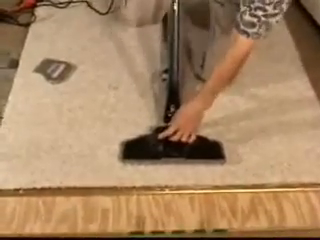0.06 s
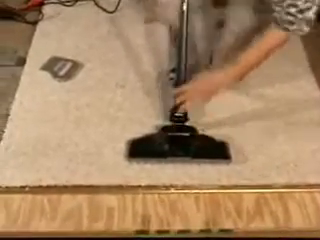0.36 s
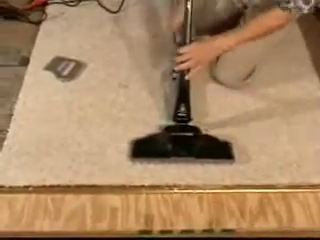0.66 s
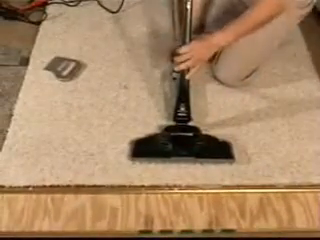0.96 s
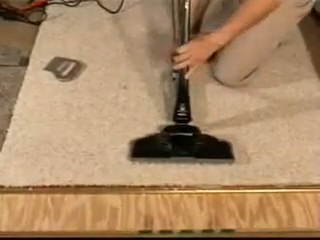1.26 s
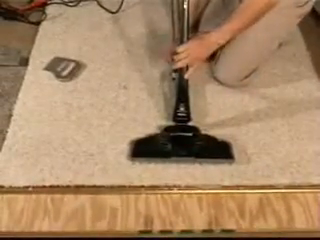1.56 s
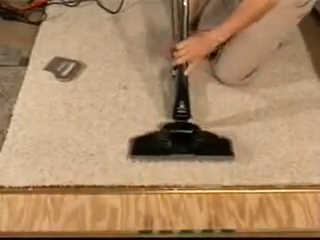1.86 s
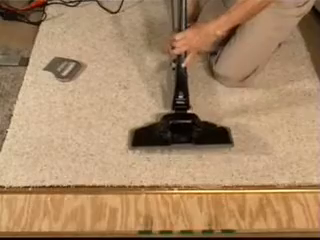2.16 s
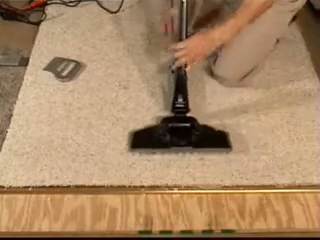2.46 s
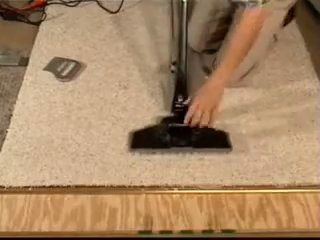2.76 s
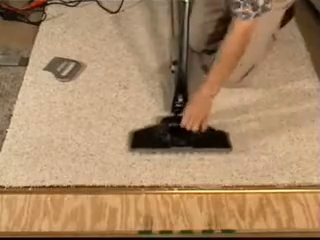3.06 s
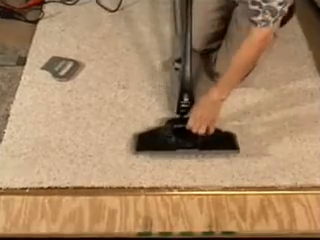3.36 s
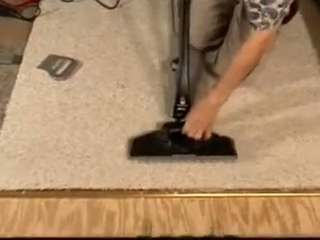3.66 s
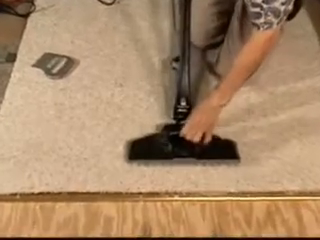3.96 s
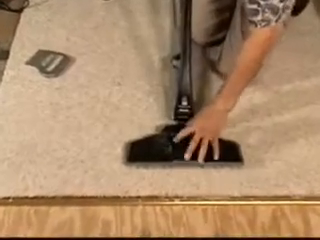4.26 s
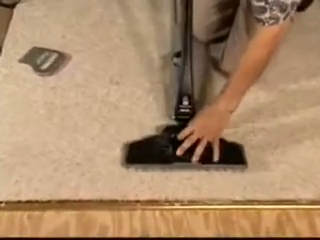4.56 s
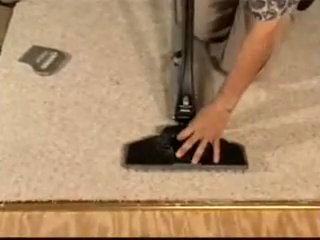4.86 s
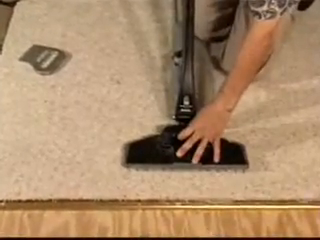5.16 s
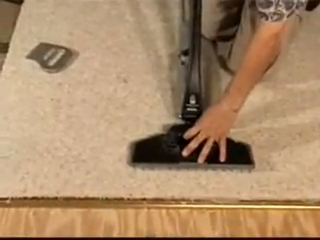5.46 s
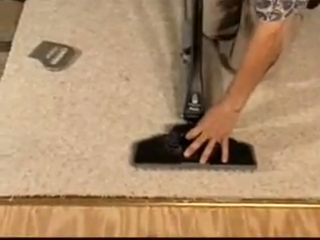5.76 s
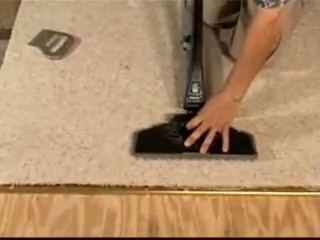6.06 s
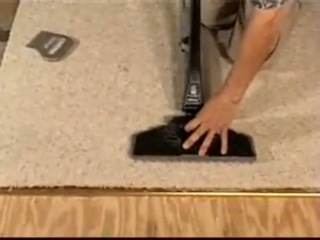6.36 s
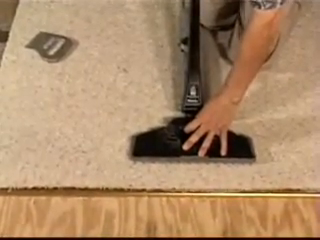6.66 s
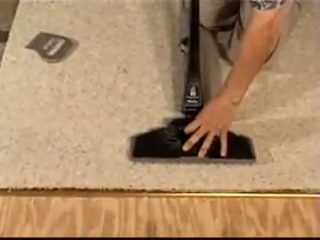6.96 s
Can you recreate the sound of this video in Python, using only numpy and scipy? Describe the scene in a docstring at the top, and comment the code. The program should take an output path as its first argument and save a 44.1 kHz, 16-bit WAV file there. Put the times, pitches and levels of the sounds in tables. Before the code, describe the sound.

A plastic vacuum floor head and its telescopic tube clack, click and rattle irregularly on carpet, with clothes rubbing close by.

```python
"""In a small room, a carpet stretcher is handled on a carpeted floor, close to the listener.
Impacts excite the modes of its hollow plastic head and telescopic tube, which clack and rattle;
the sprung catch snaps and rings, and the tool thuds on the boards. Friction makes its parts scrape
and squeak, and sleeves and knees rub on the pile, over a faint hum.
The loudest blows overload the microphones."""
import sys
import numpy as np
from scipy import signal
from scipy.fft import rfft, irfft, next_fast_len
from scipy.io import wavfile
from scipy.ndimage import uniform_filter1d, map_coordinates

SR = 44100
rng = np.random.default_rng(int(sys.argv[2]) if len(sys.argv) > 2 else 0)


def materialize(psi):
    """Save the field psi as 16-bit PCM at rate SR to the path in sys.argv[1].

    A 1-D psi becomes a single channel; in a 2-D psi each row is a channel.
    """
    bounded = np.clip(np.atleast_2d(psi).T, -1, 1)
    quanta = np.round(bounded * 32767).astype(np.int16)
    wavfile.write(sys.argv[1], SR, quanta)


N = 318446

# normal modes of head and tube: pitch_hz, level_db, t60_s
HOUSING_MODES = [(336.7, -16.5, 0.2), (477.5, -4, 0.19), (517, -8, 0.2), (556.6, -2.5, 0.063),
                 (690, -9, 0.022), (856, -8.5, 0.081), (980.6, -1, 0.051), (1019.7, -7.5, 0.12),
                 (1092, -12, 0.23), (1177, -2.5, 0.059), (1512, 1.5, 0.016), (1540, -26, 0.25),
                 (1707, -1.5, 0.062), (1846, -2.5, 0.092), (1940, -9, 0.11), (2276, -4, .08),
                 (2344, -27.5, 0.12), (2565, -7, 0.074), (3050, -24, 0.038)]


def amp(db):
    """Amplitude grows tenfold every 20 decibels."""
    return 10 ** (np.asarray(db) / 20)


def unit(x):
    """Normalisation to rms 1."""
    return x / np.sqrt(np.mean(x ** 2) + 1e-20)


def along(points, hz):
    """Interpolation of (frequency_hz, value) points on a logarithmic frequency axis."""
    knots_hz, values = np.transpose(points)
    return np.interp(np.log(hz + 1), np.log(knots_hz + 1), values)


def wobble(rate):
    """Slow random modulation: a spline through rate knots a second."""
    return map_coordinates(rng.standard_normal(int(N * rate / SR) + 4), [np.arange(N) * rate / SR])


def filtered(x, response):
    """Linear filtering: the spectrum is multiplied by a frequency response."""
    size = next_fast_len(N + SR // 2)
    return irfft(rfft(x, size) * response(np.fft.rfftfreq(size, 1 / SR)), size)[..., :N]


def panned(x, pan_db):
    """A level difference, left minus right, gives a sound its direction."""
    return amp([[pan_db / 2], [-pan_db / 2]]) * x


def placed(x, s):
    """The level difference follows the hand along the tool, here at s seconds."""
    # hand position: time_s, pan_db
    hand_path = [(0, -2.5), (1.5, -5.5), (1.9, -2.5), (2.3, 1), (3.0, -1), (3.8, -1.5), (4.9, -3), (5.4, 1),
                 (7.2, -1)]
    return panned(x, np.interp(s, *np.transpose(hand_path)))


def add(track, s, sound):
    """Superposition: a sound joins the track at s seconds."""
    part = track[:, round(s * SR):][:, :sound.shape[-1]]
    part += sound[..., :part.shape[-1]]


def rush(spectrum, pan_db, side_db):
    """Partly coherent stereo noise of a given spectrum and rms 1."""
    mid, side = filtered(rng.standard_normal((2, N)), lambda hz: amp(along(spectrum, hz)))
    return unit(panned(mid, pan_db) + amp(side_db) * np.array([side, -side]))


def swells(rows, fall_ratio=1.71, roundness=2.17):
    """Incoherent strokes (peak_s, rise_s, level_db) add in power; each falls slower than it rises."""
    s, rise, db = np.transpose(rows)[:, :, None]
    t = np.arange(0, N / SR, .002)
    from_peak = np.maximum(s - t, (t - s) / fall_ratio) / rise
    gains = amp(db) * np.exp(-np.minimum(from_peak, 10) ** roundness)
    return np.interp(np.arange(N) / SR, t, np.linalg.norm(gains, axis=0))


def ring(modes, t, scatter_db, detune, focus_hz=1000, focus_db=0, focus_octaves=0.39):
    """Free vibration as a sum of damped modes; the contact point favours those near focus_hz."""
    hz, db, t60 = np.transpose(modes)[:, :, None]
    size, shift, phase = rng.standard_normal((3, len(modes), 1))
    favour = focus_db * (.5 - np.minimum((np.log2(hz / focus_hz) / focus_octaves) ** 2, 1))
    waves = np.sin(2 * np.pi * (hz * (1 + detune * shift) * t + phase))
    return np.sum(amp(db + favour + scatter_db * size) * np.exp(-np.log(1000) * t / t60) * waves, axis=0)


def chatter(t, t60, grain_db, hold=1, echo=0.63):
    """Tiny contacts die away, comb-filtered by echoes in the hollow parts; hold > 1 delays the fall."""
    grain = unit(uniform_filter1d(rng.standard_normal(len(t)), size=44))
    burst = rng.standard_normal(len(t)) * amp(grain_db * grain - 20 * (3 * t / t60) ** hold)
    cavity = np.zeros(SR // 400)
    cavity[rng.integers(12, len(cavity), size=3)] = echo * rng.choice([-1, 1], size=3)
    cavity[0] = 1
    return signal.lfilter(cavity / np.linalg.norm(cavity), [1], burst)


def voiced(blow, levels_db):
    """Spectral balance sets timbre: the onset of a blow is scaled to a level in each of four bands."""
    # thump, hollow, shell and crack bands: low_hz, high_hz
    bands = [(25, 200), (200, 750), (750, 2800), (2800, 11500)]
    out = np.zeros(len(blow))
    for edges, db in zip(bands, levels_db):
        band = signal.sosfilt(signal.butter(3, edges, "band", fs=SR, output="sos"), blow)
        onset = round(SR * max(.012, .6 / edges[0]))
        out += amp(db) * band / np.sqrt(np.mean(band[:onset] ** 2))
    return out


def stick_slip(rows, sag, waver, pan_db):
    """Quick slips merge into a rough tone; its pitch follows the speed, ending at sag times the first."""
    out = np.zeros((2, N))
    for s, length, hz, db in rows:
        size = round(length * SR)
        jitter, grip = unit(uniform_filter1d(rng.standard_normal((2, size)), size=60))
        speed = np.linspace(1, sag, size) * (1 + waver * jitter)
        tone = np.sin(2 * np.pi * np.cumsum(hz * speed) / SR)
        rough = unit(tone * amp(5 * grip))
        add(out, s, panned(amp(db) * rough * signal.windows.tukey(size, .5), pan_db))
    return out


def hum():
    """Steady pure tones superpose into the room's faint hum."""
    # partials: pitch_hz, level_db
    tones = [(60, -52.5), (840, -57.5), (958, -63), (1324, -57), (1567, -67)]
    t = np.arange(N) / SR
    return sum(np.sqrt(2) * amp(db) * np.sin(2 * np.pi * (hz * t + rng.random())) for hz, db in tones)


def reverberation(x):
    """A diffuse field decays exponentially, with a different tail at each side."""
    # reverberation times: frequency_hz, t60_s
    decay_times = [(150, 0.12), (1000, 0.17), (4000, 0.2), (11000, 0.17)]
    hz, t, noise = signal.stft(rng.standard_normal((2, SR // 2)), SR, nperseg=256)
    tail = signal.istft(noise * amp(-60 * t / along(decay_times, hz)[:, None]), SR, nperseg=256)[1]
    tail = np.pad(tail, ((0, 0), (SR // 250, 0)))  # reflections arrive 4 ms late
    return signal.fftconvolve(x, tail / np.linalg.norm(tail[0]), axes=1)[:, :N]


def rubbing(rumble_db=-10):
    """Sliding friction of knees and sleeves makes broadband noise: rumble, pile scuff and cloth hiss."""
    # strokes over the pile: peak_s, rise_s, scuff_db, hiss_over_scuff_db
    strokes = [(0.02, 0.15, -31, -24), (0.26, 0.22, -34, 0), (0.62, 0.032, -49, 9.5),
               (0.88, 0.13, -45, 2.5), (1.438, 0.1, -28, -1.5), (1.68, 0.083, -37.5, -2),
               (1.97, 0.14, -37.5, -2.5), (2.13, 0.11, -31.5, 1.5), (2.289, 0.078, -23, -0.5),
               (2.44, 0.076, -26, -2.5), (2.7, 0.15, -41.5, 3), (3.2, 0.17, -39.5, -2),
               (3.73, 0.14, -37.5, -4), (4.28, 0.14, -31, -11), (4.5, 0.15, -32, -15),
               (4.81, 0.09, -42.5, -1), (5.32, 0.12, -40.5, 2), (5.76, 0.31, -36.5, -7.5),
               (6.23, 0.19, -34.5, -1.5), (6.58, 0.2, -36, -5.5), (7.2, 0.19, -40.5, -5.5)]
    # spectra of the three noises: frequency_hz, density_db
    rumble_spectrum = [(12, -37), (20, -3), (50, -1), (166, -4), (214, -7.5), (300, -7), (390, -10.5),
                       (660, -120)]
    scuff_spectrum = [(110, -54), (180, -3), (367, 3), (408, -0.5), (515, 1.5), (634, -3.5), (1020, -5),
                      (1150, -7), (1770, -8.5), (2850, -15.5), (4000, -30), (5200, -36), (8800, -120)]
    cloth_spectrum = [(1290, -38), (2200, -1.5), (2850, -3.5), (4080, 1.5), (5330, -2), (6180, 0),
                      (8600, -5.5), (10500, -4), (11200, -3), (11800, -31), (15300, -43), (22000, -120)]
    # levels between strokes: rumble_db, scuff_db, hiss_db
    rest_db = (-45.5, -44.5, -48)
    scuff = swells([(s, rise, db) for s, rise, db, _ in strokes])
    cloth = swells([(s, rise, db + hiss_db) for s, rise, db, hiss_db in strokes])
    rumble, scuff, cloth = np.hypot([amp(rumble_db) * scuff, scuff, cloth], amp(rest_db)[:, None])
    low = rumble * amp(4.0 * wobble(22)) * rush(rumble_spectrum, pan_db=-1.5, side_db=-6)
    pile = scuff * amp(1.4 * wobble(60)) * rush(scuff_spectrum, pan_db=-2, side_db=-10)
    hiss = cloth * amp(0.69 * wobble(90)) * rush(cloth_spectrum, pan_db=-4, side_db=-11)
    return low + pile + hiss


def bumps(floor_hz=65, t60=0.13, attack_s=0.012):
    """Soft impacts of knees and palms excite only a few uneven low cycles in the floor."""
    # landings: start_s, level_db
    landings = [(0.452, -25), (0.565, -23), (0.89, -23.5), (2.13, -14), (2.774, -20), (2.935, -15.5),
                (3.345, -30), (4.745, -19), (5.655, -24), (6.853, -17)]
    out, t = np.zeros((2, N)), np.arange(SR // 4) / SR
    for s, db in landings:
        hz = floor_hz * rng.lognormal(0, 0.45, size=(6, 1))
        uneven = unit(np.sin(2 * np.pi * hz * t).sum(axis=0))
        add(out, s, amp(db - 60 * t / t60) * (1 - np.exp(-t / attack_s)) * uneven)
    return out


def cloth_zips():
    """Periodic contact of ribbed cloth gives a tone that falls as the rub slows."""
    # rubs: start_s, length_s, first_pitch_hz, level_db
    rubs = [(1.665, 0.04, 11200, -43), (1.67, .04, 6440, -42), (1.8, 0.045, 5330, -45),
            (3.68, 0.17, 11300, -50), (4.17, .053, 10900, -42), (6.53, .096, 11500, -46),
            (6.53, 0.2, 6600, -40.5)]
    return stick_slip(rubs, sag=0.87, waver=.018, pan_db=-2)


def tube_squeaks():
    """Stick-slip friction makes the tube squeak in its sleeve."""
    # squeaks: start_s, length_s, pitch_hz, level_db
    slips = [(1.871, .016, 1080, -14), (2.102, .011, 11150, -12), (2.108, .02, 9000, -21),
             (2.112, .04, 4880, -30), (2.144, .016, 1440, -21)]
    return stick_slip(slips, sag=1, waver=.02, pan_db=-1)


def tube_slides(tube_hz=1040, width_hz=110):
    """Forced vibration: friction of the inner tube drives the tube's strongest resonance."""
    # slides: peak_s, rise_s, level_db
    slides = [(1.48, 0.072, -31), (1.95, 0.078, -33.5), (2.29, 0.053, -33), (2.485, 0.048, -22.5)]
    resonance = lambda hz: (1j * hz * width_hz / (tube_hz ** 2 - hz * hz + 1j * hz * width_hz)) ** 2
    friction = unit(filtered(rng.standard_normal(N), resonance))
    return panned(swells(slides) * friction, pan_db=-2)


def scrapes(ring_share=0.49, width_hz=90, db_per_octave=6):
    """Source and filter: the friction noise of plastic on plastic is coloured by the housing's modes."""
    # drags: peak_s, half_length_s, level_db, centre_hz
    drags = [(0.046, 0.015, -23.5, 710), (0.344, 0.0066, -18.5, 1200), (0.366, 0.037, -23.5, 1060),
             (1.927, 0.012, -29, 2280), (3.137, 0.033, -25.5, 900), (3.285, 0.014, -28.5, 1230),
             (4.134, 0.065, -26.5, 1400), (4.473, 0.034, -25.5, 1300), (5.668, 0.023, -24.5, 875)]
    out = np.zeros((2, N))
    for s, half, db, centre_hz in drags:
        t = np.arange(SR // 4) / SR + max(s - .1, 0)
        f = np.fft.rfftfreq(len(t), 1 / SR) + 1
        modes = sum(amp(level) / (1 + 2j * (f - hz) / width_hz) for hz, level, _ in HOUSING_MODES)
        rolloff = amp(-db_per_octave * np.abs(np.log2(f / centre_hz)))
        colour = (ring_share * np.abs(modes) + (1 - ring_share) / 2) * rolloff
        friction = unit(irfft(rfft(rng.standard_normal(len(t))) * colour, len(t)))
        add(out, t[0], panned(amp(db) * friction * np.exp(-((t - s) / half) ** 2 / 2), pan_db=-4))
    return out


def thuds(attack_s=0.0011, gain_db=9.5):
    """Cushioned impact: the pile softens the tool's landing, so only low board modes answer."""
    # landings: start_s, relative_db
    landings = [(0.163, -26), (2.104, -30), (5.629, -26.5), (5.662, -15.5), (5.676, -21), (6.855, -30)]
    # modes of the boards: pitch_hz, level_db, t60_s
    board_modes = [(247, -8.5, 0.12), (316, 4.5, 0.049), (359, -7, 0.18), (520, -0.5, 0.037),
                   (1020, -36, 0.092)]
    out, t = np.zeros((2, N)), np.arange(SR // 3) / SR
    for s, db in landings:
        boom = ring(board_modes, t, scatter_db=1.5, detune=0.013) * (1 - np.exp(-t / attack_s))
        add(out, s, panned(amp(db + gain_db) * boom, pan_db=-3))
    return out


def spring_pings():
    """Light damping lets the catch's steel spring ring on after some firm snaps."""
    # pings: start_s, level_db
    pings = [(5.269, -21), (5.717, -39), (5.955, -27.5), (6.215, -31), (6.604, -27), (7.063, -36)]
    # modes of the spring: pitch_hz, level_db, t60_s
    spring_modes = [(1523, -10, .15), (2153, -17, .2), (4316, 0, .35), (4425, -9, .22), (5475, -11, .25),
                    (7368, -15, .24)]
    out, t = np.zeros((2, N)), np.arange(SR // 2) / SR
    for s, db in pings:
        add(out, s, placed(amp(db) * ring(spring_modes, t, scatter_db=1, detune=.0003), s))
    return out


def catch_snaps(attack_s=0.00072, buzz_db=-21, buzz_t60=0.34, push_hz=100, push_s=0.0016):
    """A brief impact has a broad spectrum: the catch cracks with a low push, and the parts buzz on."""
    # snaps: start_s, strength_db, t60_s
    snaps = [(1.336, -28, 0.076), (1.423, -18.5, 0.17), (1.436, -25, 0.034), (1.466, -23, .06),
             (1.501, -18.5, 0.089), (2.105, -17.5, 0.12), (2.264, -9, 0.065), (2.287, -18, 0.2),
             (4.828, -42.5, 0.017), (5.268, -10, 0.045), (5.278, -14.5, 0.093), (5.597, -19.5, 0.022),
             (5.675, -26.5, 0.013), (5.717, -13, 0.041), (5.797, -30.5, 0.014), (5.898, -34, .02),
             (5.923, -34, 0.0065), (5.955, -15.5, 0.042), (5.975, -23, 0.019), (6.034, -33, 0.036),
             (6.133, -35, 0.016), (6.214, -16.5, 0.068), (6.506, -34, 0.022), (6.604, -15.5, 0.022),
             (6.854, -19.5, 0.034), (7.063, -19.5, 0.06)]
    # band levels relative to the strength: thump_db, hollow_db, shell_db, crack_db
    colour_db = (-13, -11, -1.5, 1.5)
    out, t = np.zeros((2, N)), np.arange(SR // 2) / SR
    push = 0.72 * np.sin(2 * np.pi * push_hz * t) * np.exp(-t / push_s)
    for s, db, t60 in snaps:
        crack = chatter(t, t60, grain_db=3, hold=1.3)
        buzz = amp(buzz_db) * chatter(t, buzz_t60, grain_db=2)
        # the contact is not perfectly hard, so the treble is softened
        softened = signal.lfilter([1], [1, -.55], crack + buzz)
        blow = (softened + push) * (1 - np.exp(-t / attack_s))
        add(out, s, placed(amp(db) * voiced(blow, colour_db), s))
    return out


def clacks(rattle_db=1, attack_s=0.00013, chatter_t60=0.094, halving_db=5.5):
    """Impacts ring head and tube and rattle loose joints; harder contact cracks more and ends sooner."""
    # blows: start_s, strength_db, boom_db, hardness_db, most_excited_hz
    blows = [(0.1, -28, 6.5, -2, 950), (0.158, -20, 10.5, -3, 634), (0.194, -21, -4, 1.5, 1280),
             (1.227, -27, -8, -3.5, 1370), (1.797, -25.5, -20, -8, 1080), (1.864, -19, -10, 0, 1110),
             (1.871, -21, 1.5, -3.5, 1140), (2.387, -14.5, -18, 12.5, 1190), (2.397, -3.5, -2, 5.5, 1150),
             (2.415, -5, -21, 1, 1100), (2.429, -15, -2, 11.5, 1100), (2.487, -18.5, -6, -9, 1020),
             (2.973, -8, -1.5, 1, 895), (2.983, -10, -8.5, -3, 910), (3.017, -20, 0, 0, 1050),
             (3.101, -12.5, 2, 1, 1050), (3.429, -34.5, -27, 7.5, 1300), (3.819, -28, -1, 6.5, 1010),
             (3.886, -28, -5, 0.5, 1050), (4.043, -19, -1, -0.5, 1280), (4.087, -7, -9.5, 2, 1470),
             (4.228, -21.5, -5, 4.5, 970), (4.292, -21, -2.5, -3, 1020), (4.32, -25, 0, 1, 1110),
             (4.376, -10, -4.5, 3.5, 1070), (4.395, -19, -3, 5, 1120), (4.431, -12, -2.5, -5.5, 1210),
             (4.455, -22.5, 1, -9, 1320), (4.489, -20, 1, 4, 1650), (4.498, -9, -7.5, 2, 1710),
             (4.564, -20.5, 1.5, 10.5, 1290), (4.724, -7, -4.5, -2, 1520), (4.994, -25.5, -3.5, -5, 1190)]
    # spectrum of loose plastic: frequency_hz, density_db
    rattle_spectrum = [(100, 2.5), (1500, 9), (2500, 6.5), (3300, -1), (5000, 0), (7500, -11),
                       (11000, -18.5)]
    out, t = np.zeros((2, N)), np.arange(SR // 3) / SR
    plastic = amp(along(rattle_spectrum, np.fft.rfftfreq(len(t), 1 / SR)))
    for s, db, boom_db, hardness_db, struck_hz in blows:
        t60 = chatter_t60 * 2 ** (-hardness_db / halving_db)
        rattle = irfft(rfft(chatter(t, t60, grain_db=3)) * plastic, len(t)) * (1 - t / t[-1])
        body = ring(HOUSING_MODES, t, scatter_db=2.5, detune=0.0095, focus_hz=struck_hz, focus_db=10)
        blow = (body + amp(rattle_db) * rattle) * (1 - np.exp(-t / attack_s))
        colour_db = (-18, boom_db - 1, 1, hardness_db - 11)  # thump, hollow, shell, crack
        add(out, s, placed(amp(db) * voiced(blow, colour_db), s))
    return out


def scene():
    """Superposition of the tool, its reverberation, the handler's movements and the hum."""
    squeaks, zips = tube_squeaks(), cloth_zips()
    tool = clacks() + catch_snaps() + thuds() + scrapes() + tube_slides() + squeaks
    return tool + amp(-11.5) * reverberation(tool) + spring_pings() + rubbing() + bumps() + zips + hum()


def record(dry, ceiling=0.91, top_hz=11650):
    """Saturation in two unequal microphones rounds the loudest peaks; a band limit cuts the top."""
    # microphone imbalance: frequency_hz, left_minus_right_db
    imbalance = [(60, -1.5), (250, -1.7), (600, -3.4), (1200, -3.5), (2500, -1.5), (5000, 0.5),
                 (11000, -0.6)]
    heard = filtered(dry, lambda hz: amp(np.outer([.5, -.5], along(imbalance, hz))))
    rounded = heard / (1 + np.abs(heard / ceiling) ** 5) ** (1 / 5)
    return filtered(rounded, lambda hz: 1 / (1 + (hz / top_hz) ** 120))


dry = scene()
out = record(dry)
materialize(out)
```